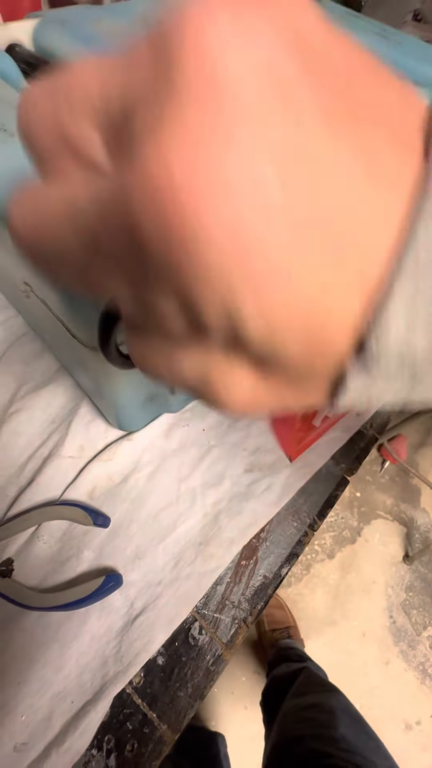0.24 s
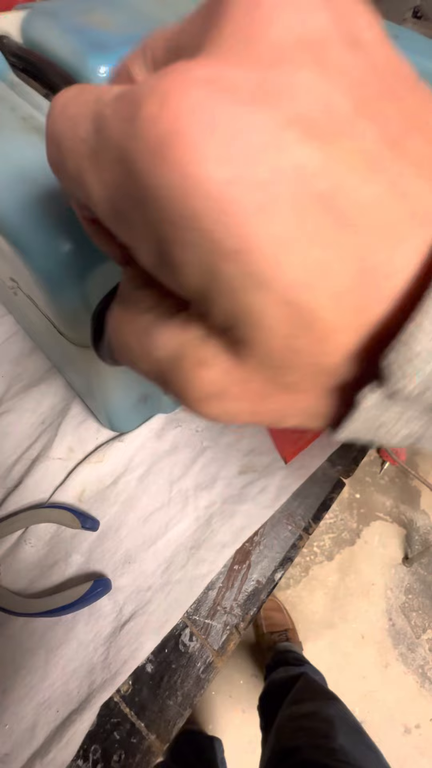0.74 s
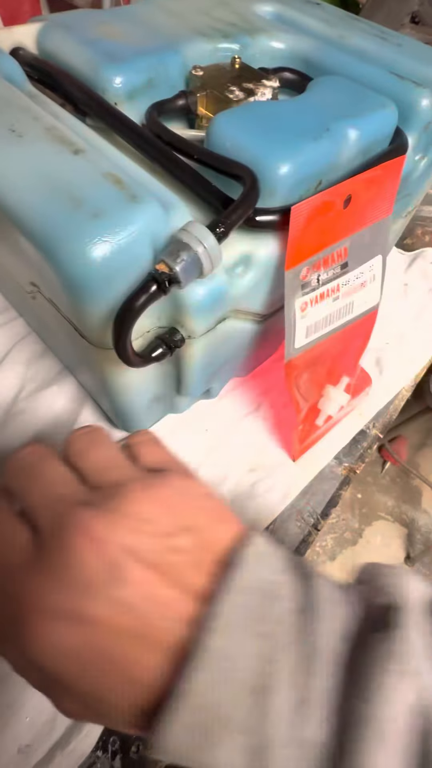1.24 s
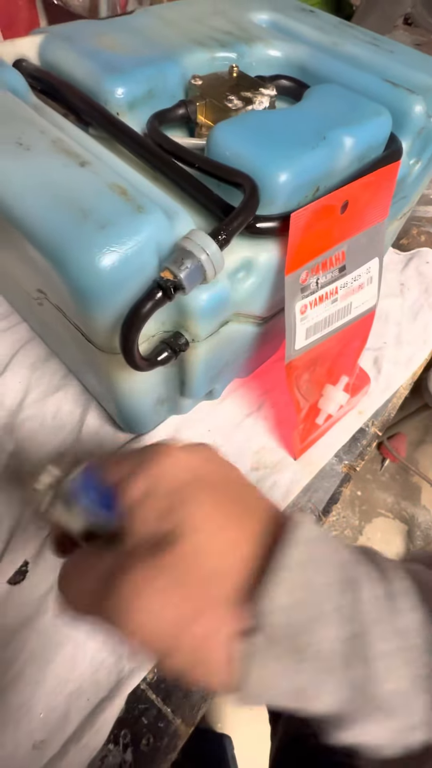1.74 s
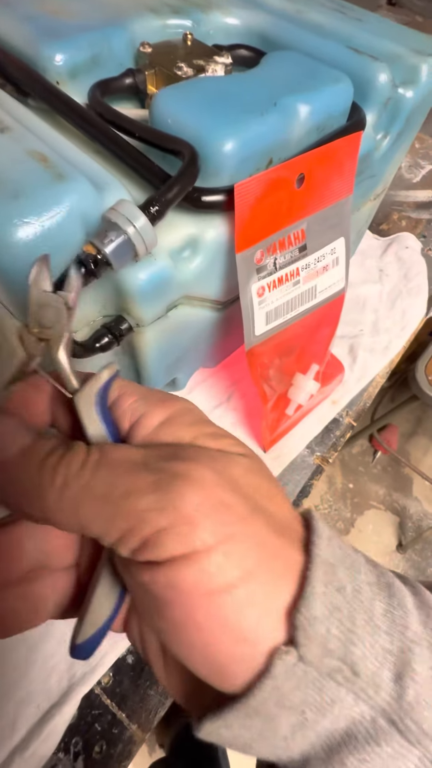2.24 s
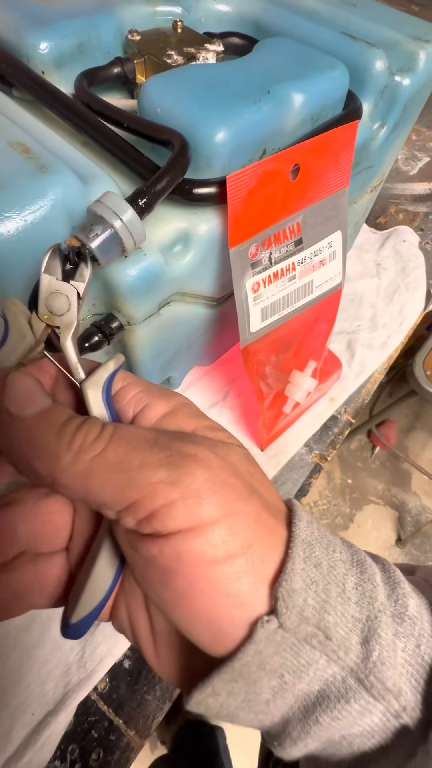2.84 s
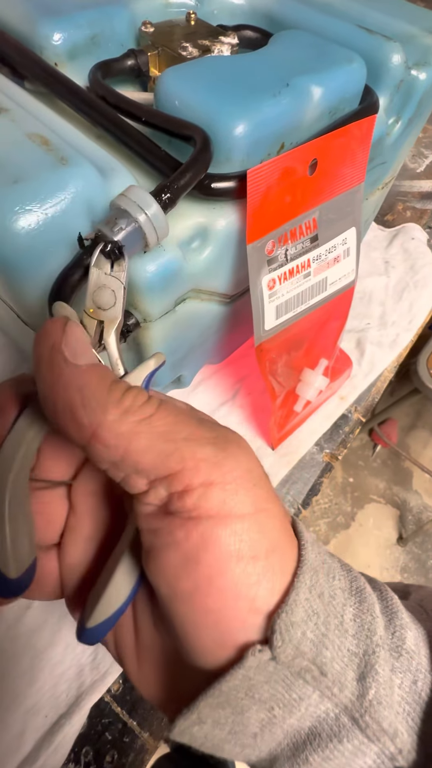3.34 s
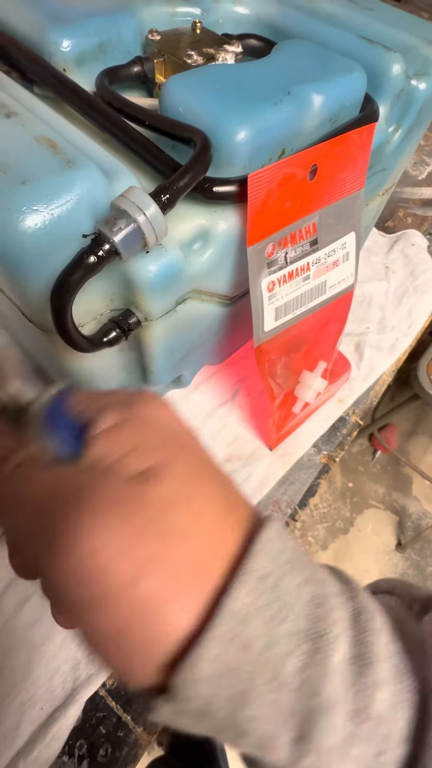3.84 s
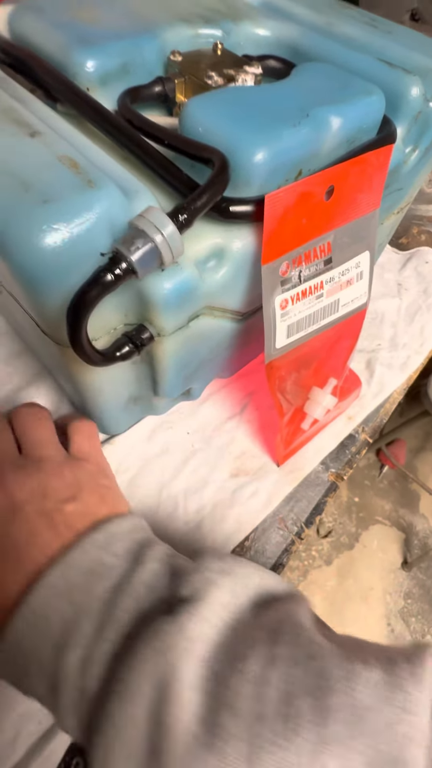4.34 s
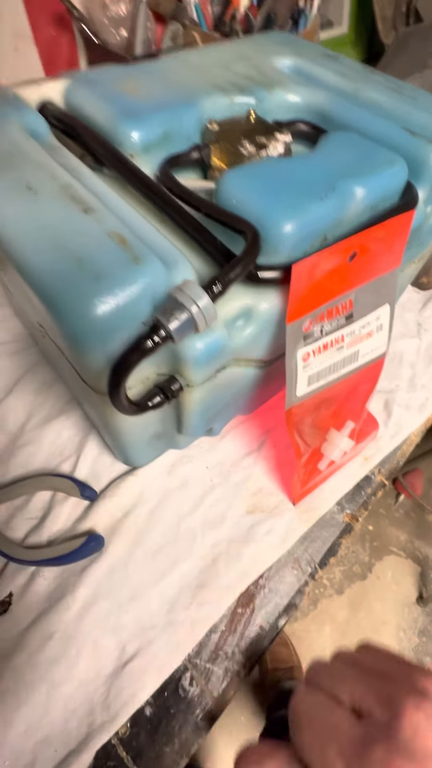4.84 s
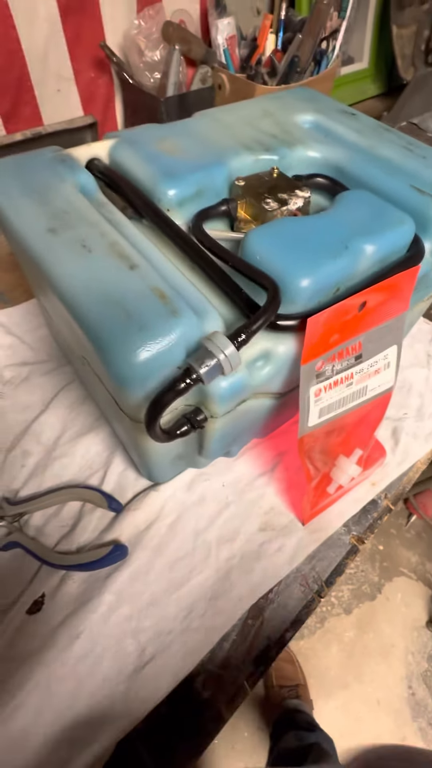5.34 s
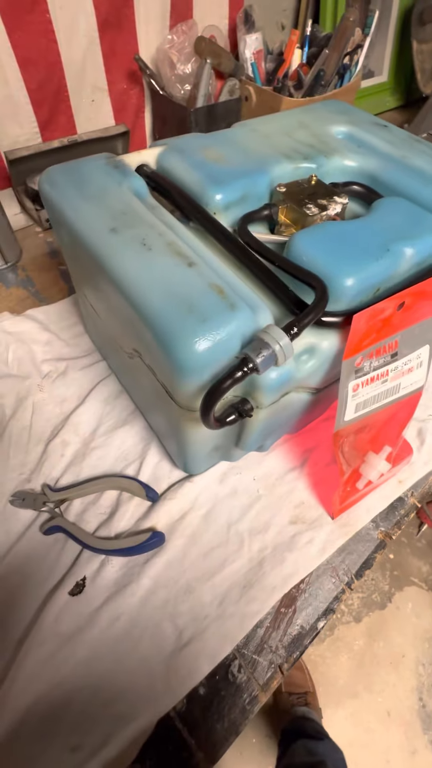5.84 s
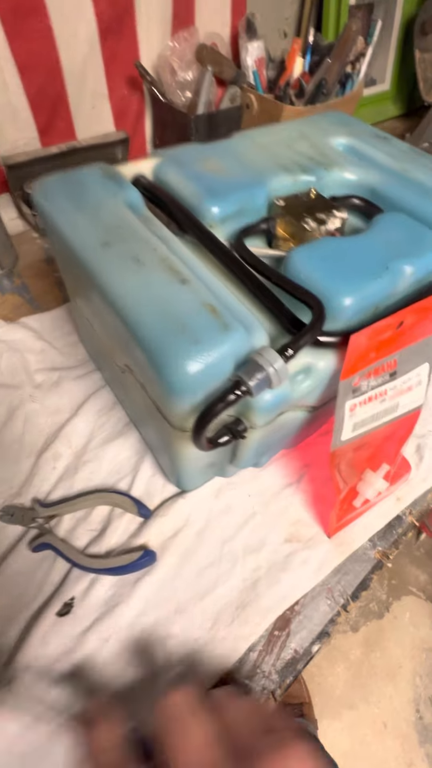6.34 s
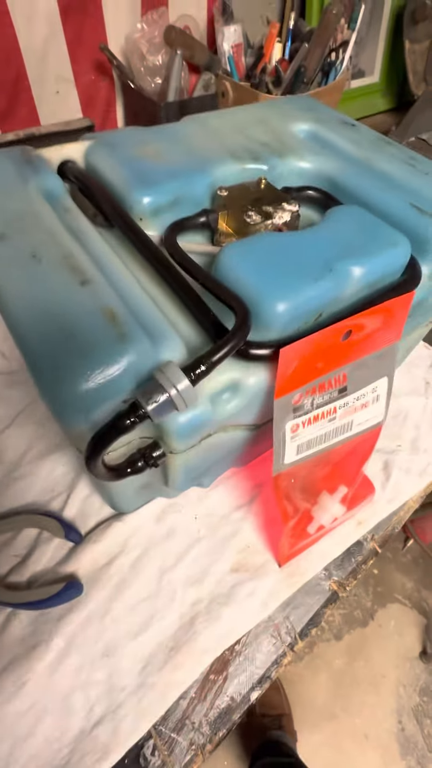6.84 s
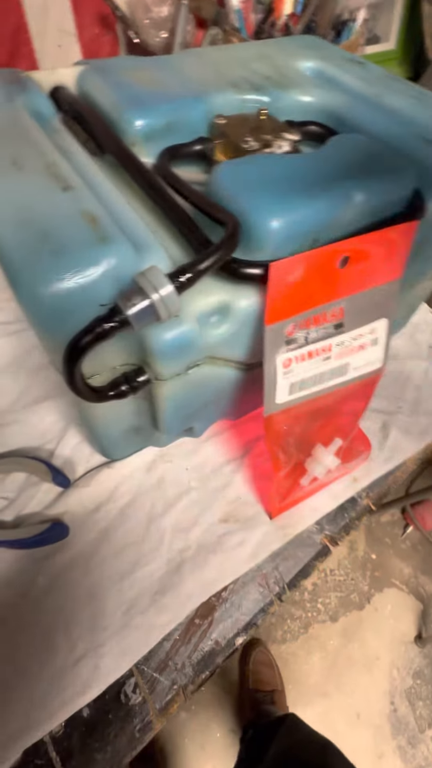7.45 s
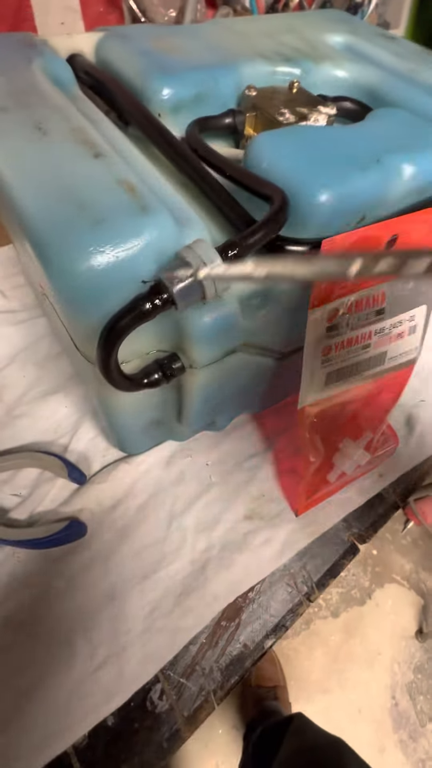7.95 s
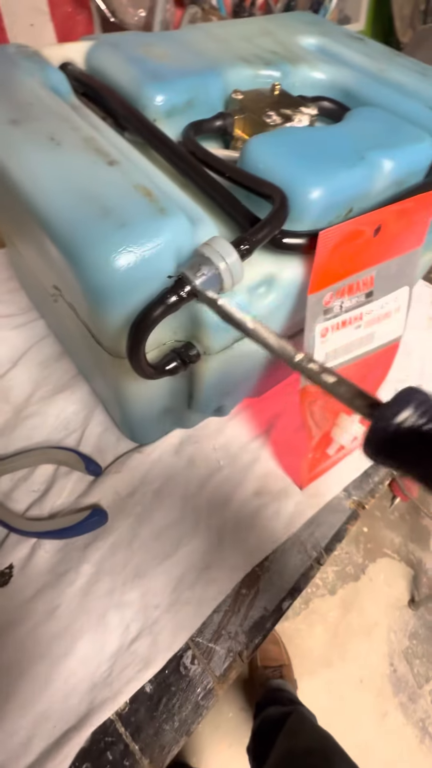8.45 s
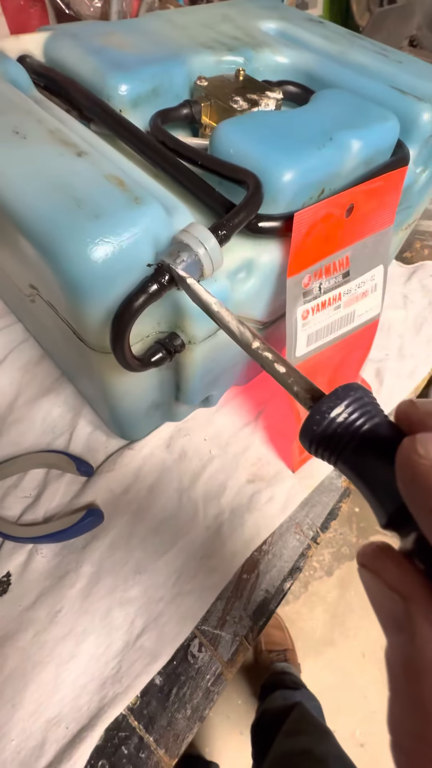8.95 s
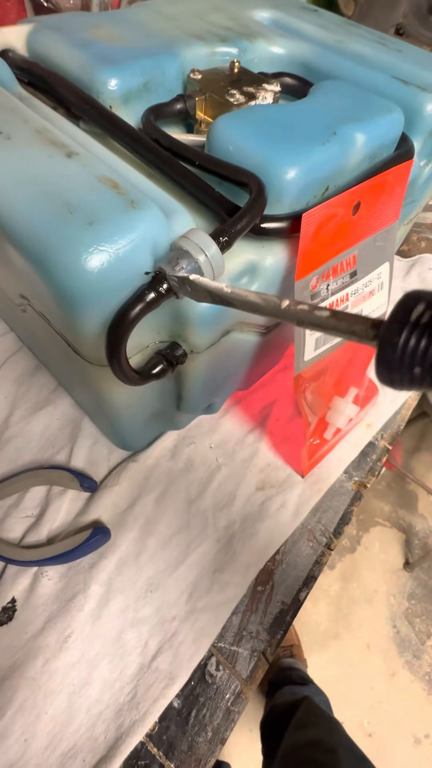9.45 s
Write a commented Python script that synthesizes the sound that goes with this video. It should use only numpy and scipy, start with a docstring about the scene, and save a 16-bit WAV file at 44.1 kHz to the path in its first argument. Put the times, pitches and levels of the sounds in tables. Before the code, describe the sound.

Close hand-held phone in a small workshop. Soft thumps and sleeve rustle on a hollow plastic tank, light ticks as cutters are positioned, then a hard double snap through a plastic tie. The pliers drop with a hollow knock; tools scrape, clink and thud on the bench. Finally a screwdriver tip ticks and scratches faintly at a hose fitting. Low mains hum throughout.

```python
"""In a small workshop, side cutters snip a plastic tie off a hose on a hollow plastic tank. Hands, pliers
and a screwdriver knock, scrape and tick on tank and bench: bursts of noise and rings at the pitches of
bench, steel and hose fitting. Sleeves rustle as flickering hiss, and a mains hum runs underneath.
A hand-held phone with two close ports hears it all; table levels are those before the overall colour."""
import sys
import numpy as np
from scipy import signal
from scipy.fft import rfft, irfft
from scipy.io import wavfile
from scipy.ndimage import uniform_filter1d

SR = 44100
rng = np.random.default_rng(int(sys.argv[2]) if len(sys.argv) > 2 else 0)


def digitize_waveform(pressure):
    """Quantize a signal to 16-bit integers and store it at the path in sys.argv[1].

    Rows of a 2-D input are taken as channels; values are limited to [-1, 1].
    """
    field = np.atleast_2d(pressure).T
    bounded = np.clip(field, -1, 1)
    quanta = np.round(bounded * 32767).astype(np.int16)
    wavfile.write(sys.argv[1], SR, quanta)


N = 427329  # length in samples
T = np.arange(N) / SR  # time in seconds
HZ = np.arange(N // 2 + 1) * SR / N + 1e-3  # pitch of each spectrum bin, kept above zero for the logarithm


def undb(db):
    """Turn decibels into a plain factor."""
    return 10 ** (np.asarray(db) / 20)


def unit(x):
    """Scale to an rms level of 1."""
    return x / np.sqrt(np.mean(x ** 2))


def shape(x, table):
    """Colour a sound by points of pitch and level, joined by straight lines over log pitch."""
    hz, db = np.transpose(table)
    gain_db = np.interp(np.log(HZ), np.log(hz), db)
    return irfft(rfft(x) * undb(gain_db), N)


def bandpass(low_hz, high_hz, order=2):
    """A filter that keeps the sound between two pitches."""
    return signal.butter(order, [low_hz, high_hz], "band", fs=SR, output="sos")


def fade(t, t60):
    """Die away by 60 dB in t60 seconds."""
    return np.exp(-np.log(1000) * t / t60)


def add(out, start, sound):
    """Mix a sound in at its start, in seconds."""
    i = int(start * SR)
    out[..., i:i + sound.shape[-1]] += sound[..., :N - i]


def walk(rate):
    """Random levels, each held 1 / rate seconds, then smoothed twice into a wander."""
    hold = int(SR / rate)
    steps = np.repeat(rng.standard_normal(N // hold + 1), hold)
    return uniform_filter1d(uniform_filter1d(steps, hold), hold)[:N]


def pressure(length):
    """Pressure rises quickly from nothing and eases off again over the length in seconds."""
    return np.sin(np.pi * (T[:int(length * SR)] / length) ** 0.47) ** 2


def press(out, rows):
    """Add a stroke of pressure for each start, length and level."""
    for start, length, db in rows:
        add(out, start, undb(db) * pressure(length))


def ring(modes, t, weights, damping, shift=0.95):
    """Sound all modes at once; each builds over a couple of its cycles, so the lows come late."""
    hz, db, t60 = np.transpose(modes)[:, :, None]
    hz = hz * np.reshape(shift, (-1, 1))  # by default every mode sounds 5 % below its table pitch
    build = 1 - np.exp(-t * hz / 2.0)
    waves = np.sin(2 * np.pi * hz * t) * fade(t, t60 / damping) * build
    return (weights * undb(db[:, 0])) @ waves


def ring_through(push, body):
    """Let a stream of small pushes set off a body's ring, scaled to unit energy."""
    return signal.fftconvolve(push, body)[:N] / np.sqrt(np.sum(body ** 2))


def ports(mid, other, table):
    """The close ports share one sound and differ by another, which is weak in the bass."""
    return mid + shape(other, table) * np.array([[1], [-1]])


# How the ports differ for sound from all round.
# Each row: pitch in Hz, level of the difference against the shared sound in dB.
PORTS_ROUND = [(30, -24.5), (200, -4), (700, 7), (1500, 0), (8000, -1), (16000, 16)]
# Colour of the room's hush. Each row: pitch in Hz, relative level in dB per Hz.
HUSH_COLOUR = [(20, -14), (45, 1), (75, 3.5), (100, -2.5), (160, -7.5), (250, -12.5), (400, -22.5),
               (800, -24), (1200, -36), (1800, -28.5), (4000, -49), (10000, -55.5)]
HUSH_DB = -64.5  # rms, before it wavers
# Tones of the mains hum. Each row: pitch in Hz, rms level in dB before it wavers.
HUM = [(119.6, -62), (239.2, -77)]


def shop():
    """A mains hum that wavers slightly over the hush of the room, whose bass heaves more than the rest."""
    drift = np.cumsum(0.00028 * walk(18)) / SR  # seconds
    hum = 0
    for hz, db in HUM:
        level = undb(db + 3.8 * walk(14.0)) * np.sqrt(2)
        hum = hum + level * np.sin(2 * np.pi * hz * (T + drift))
    mid, other = [shape(noise, HUSH_COLOUR) for noise in rng.standard_normal((2, N))]
    hush = unit(ports(mid, other, PORTS_ROUND))
    bass = signal.sosfiltfilt(signal.butter(2, 110, fs=SR, output="sos"), hush)
    wavering = bass * undb(3.6 * walk(5.8)) + (hush - bass) * undb(1.3 * walk(5.0))
    return hum + undb(HUSH_DB) * wavering


# Loudness of sleeves and cloth, gliding from row to row. Each row: time in seconds, level in dB.
RUSTLE = [(0.0, -77), (0.75, -80), (0.89, -71), (1.32, -82.5), (1.91, -76), (2.16, -83), (3.02, -81.5),
          (3.24, -64.5), (3.43, -82.5), (3.8, -73.5), (5.26, -74), (5.86, -67), (7.02, -79), (7.29, -73.5),
          (9.26, -84.5), (9.69, -76.5)]
# Colour of the cloth. Each row: pitch in Hz, relative level in dB.
CLOTH = [(500, -8), (1500, 2), (2500, 3.5), (4000, -1.5), (6000, -5.5), (9000, -3.5), (16000, -6.5)]


def rustle():
    """Fibres brush past each other: a hiss that flickers, with tiny crackles."""
    flicker_db = 0.65 * walk(27) + 2.1 * rng.exponential(size=N)
    fibres = rng.standard_normal((2, N)) * undb(flicker_db)
    mid, other = [unit(shape(f, CLOTH)) for f in fibres]
    level_db = np.interp(T, *np.transpose(RUSTLE))
    return ports(mid, other, PORTS_ROUND) * undb(level_db)


# Pitches at which tank and bench ring; the ring lowers them by 5 % and a damping shortens them.
# Each row: pitch in Hz, relative level in dB, undamped time to fade by 60 dB in seconds.
BENCH = [(128.74, 6, 0.22), (174, 6, 0.18), (200, -7.5, 0.34), (250, -16.5, 0.58), (280, -7, 0.33),
         (300.3, 6, 0.1), (339, 2.5, 0.14), (397, -11, 0.29), (506, -2.5, 0.15), (536.8, -10, 0.22),
         (536, -2.5, 0.084), (626, 2, 0.12), (700, -1.5, 0.064), (699, -5.5, 0.086), (883.5, -7, 0.23),
         (903, -10.5, 0.26), (1005, -2, 0.088), (1145, -3, 0.039), (1190, -0.5, 0.044), (1297, -5, 0.091),
         (1450, -2, 0.073), (1520, -8, 0.11), (1736, -5.5, 0.07), (2060, -4, 0.024), (2300, -12.5, 0.051)]
# Pitches at which the tools' steel rings, before any shift or damping.
# Each row: pitch in Hz, relative level in dB, undamped time to fade by 60 dB in seconds.
STEEL = [(1766, -8.5, 0.31), (2065, -5.5, 0.25), (2696, -4.5, 0.093), (3160, -6.5, 0.1),
         (3430, -14.5, 0.07), (3850, -5, 0.044), (4450, -9.5, 0.059), (5090, -13, 0.062),
         (5800, -11, 0.024), (6100, -12, 0.075)]
# Things dragged over tank and bench; levels are at full pressure, before they cluster.
# Each row: start in seconds, length in seconds, body level in dB, hardness as grit against body in dB.
DRAGS = [(0.083, 0.39, -65, -4), (0.652, 0.665, -65.5, -7), (0.966, 0.06, -47.5, -3),
         (1.417, 0.14, -57.5, -10), (2.339, 0.08, -57, -2), (2.57, 0.049, -73, 5.5),
         (2.737, 0.104, -58.5, -13), (2.886, 0.04, -62.5, -5.5), (3.075, .124, -59.5, -19),
         (3.2, .123, -59, -21), (3.605, 0.18, -52.5, -19.5), (3.616, 0.025, -46.5, 8),
         (3.846, 0.029, -58.5, -7), (4.277, 0.09, -40.5, -8), (5.57, 0.068, -62.5, -41),
         (5.612, 0.11, -48.5, -5.5), (5.641, 0.078, -34.5, -3.5), (5.724, 0.067, -38.5, -4.5),
         (5.765, 0.077, -51, -6), (5.827, 0.32, -51.5, -18.5), (6.415, 0.035, -44, -1),
         (6.467, 0.2, -54.5, -3), (6.589, 0.06, -42, 4.5), (6.653, 0.15, -57.5, -15),
         (6.803, 0.18, -55.5, -12), (6.928, 0.089, -54, -0.5), (8.149, 0.064, -60.5, -1.5),
         (8.357, 0.185, -59.5, -3.5), (8.743, 0.11, -63.5, -4), (9.002, 0.026, -54, -6),
         (9.402, 0.46, -65.5, -5.5)]
# Steel grinds hard on steel or on the tie, with the same clustering.
# Each row: start in seconds, length in seconds, level at full pressure in dB.
GRINDS = [(1.639, 0.026, -71), (3.03, 0.21, -76), (3.629, 0.025, -35.5), (3.66, 0.07, -50.5),
          (6.83, 0.24, -67), (6.94, 0.11, -86), (8.458, 0.046, -71)]
RASP_DB = -10  # the steel's share of a drag, against the grit
BODY_DAMPING, GRIT_DAMPING, STEEL_DAMPING = 3.8, 1.7, 1.7  # 1 = rings freely


def drags_and_grinds():
    """Uneven slips ring the bench's low modes, grate through its upper ones and rasp on the steel."""
    low, t = np.array(BENCH)[:, 0] < 700, T[:SR // 4]
    slip_now = rng.random((3, N)) < 1000 / SR  # about 1000 slips a second
    slips = slip_now * undb(10 * rng.random((3, N))) * rng.standard_normal((3, N))
    click = 1. * (t == 0)
    scratch = signal.sosfilt(bandpass(1800, 7500), click)
    steel = unit(ring(STEEL, t, 1., STEEL_DAMPING)) + undb(-3) * unit(scratch)
    body = ring(BENCH, t, 1. * low, BODY_DAMPING)
    grit = ring(BENCH, t, 1. * ~low, GRIT_DAMPING)
    push = np.zeros((3, N))  # on body, grit and steel
    for start, length, db, hardness in DRAGS:
        levels_db = [db, db + hardness, db + hardness + RASP_DB]
        add(push, start, undb(levels_db)[:, None] * pressure(length))
    press(push[2], GRINDS)
    push *= undb(5.0 * walk(120))  # it sticks and lets go in clusters
    return sum(ring_through(p * unit(s), b) for p, s, b in zip(push, slips, (body, grit, steel)))


# How the ports differ for work on the bench.
# Each row: pitch in Hz, level of the difference against the shared sound in dB.
PORTS_BENCH = [(30, -32.5), (200, -22.5), (400, -10.5), (700, -1), (2400, -6), (4400, 1), (8000, -2.5),
               (16000, 11.5)]
# The room's answer, band by band.
# Each row: middle pitch in Hz, relative level in dB, time to fade by 60 dB in seconds.
ROOM = [(139, -19, 0.55), (460, -18, 0.48), (760, -20, 0.55), (1500, -19.5, 0.077), (4040, -25, 0.12),
        (9000, -14.5, 0.17)]


def echo(x):
    """The walls answer with noise tails, band by band."""
    t = T[:SR // 2]
    rise = np.minimum(t / 0.0038, 1)
    tails = 0
    for hz, db, t60 in ROOM:
        band = bandpass(0.54 * hz, 1.26 * hz, order=1)
        noise = signal.sosfilt(band, rng.standard_normal((2, len(t))))
        # the square root evens out long tails and wide bands
        tails = tails + undb(db) * fade(t, t60) / np.sqrt(t60 * hz) * rise * noise
    mid, other = signal.fftconvolve(x[None], tails, axes=1)[:, :N]
    return ports(mid, other, PORTS_BENCH)


# Deep tones that swell and die after shoves or handling of the phone.
# Each row: start in seconds, peak level in dB, pitch in Hz, time scale of the swell in seconds.
BOOMS = [(0.123, -41.5, 64, 0.012), (0.377, -31, 61.5, 0.003), (0.79, -42.5, 61.8, 0.0036),
         (0.989, -37, 62.9, 0.0064), (1.4, -44.5, 60, 0.023), (3.211, -42.5, 66.6, 0.0035),
         (3.665, -38.5, 46.5, 0.048), (4.345, -34, 62.3, 0.067), (5.622, -44.5, 67.2, 0.12),
         (5.921, -40, 65.4, 0.086), (6.439, -42.5, 63.5, 0.027), (6.62, -45.5, 65, 0.024)]
# Dead, deep bumps. Each row: start in seconds, peak level in dB, pitch in Hz.
BUMPS = [(0.3642, -23, 101), (3.623, -20, 51.95)]
BOOM_T60_S = 0.52
BUMP_SWELL_S, BUMP_CYCLES = 0.0033, 1.8  # a bump's fade by 60 dB is counted in cycles


def booms():
    """A deep tone swells after a shove or handling of the phone, then dies; a bump lasts a few cycles."""
    out, t = np.zeros(N), T[:SR]
    rows = [(*row, BOOM_T60_S) for row in BOOMS]
    rows += [(start, db, hz, BUMP_SWELL_S, BUMP_CYCLES / hz) for start, db, hz in BUMPS]
    for start, db, hz, swell, t60 in rows:
        envelope = (1 - np.exp(-t / swell)) ** 2 * fade(t, t60)
        add(out, start, undb(db) * np.sin(2 * np.pi * hz * t) * envelope / envelope.max())
    return out


# Knocks through tank and bench. Each row: start in seconds, peak level of the ring in dB,
# favoured pitch in Hz among the bench's table pitches, damping (1 = rings freely),
# strength of the slap noise against the ring in dB.
KNOCKS = [(.124, -39.5, 174, 2.6, 4), (.3665, -28, 125, 3.1, -33), (.805, -44, 1000, 2.5, 2),
          (.807, -38, 397, 3.5, -15), (.904, -49, 298, 2.6, -21), (0.995, -33.5, 198, 2.6, -30),
          (2.347, -45, 183, 2.3, -20), (2.583, -50, 250, 1.4, -26), (2.757, -43, 200, 3, -35),
          (2.899, -49.5, 173, 1.8, -25), (3.203, -26.5, 880, 2.8, -18.5), (3.213, -27, 183, 4.9, -27),
          (4.2938, -28.5, 1350, 4.4, -10.5), (4.2947, -7, 361, 3.67, -26), (4.2955, -11, 637.4, 2.1, -33.5),
          (4.306, -18, 148.9, 0.74, -41.5), (4.331, -30, 1015, 2.5, -3.5), (5.689, -23, 356, 2.4, -33),
          (5.879, -43, 1330, 1.1, 0), (5.886, -31, 194, 1.4, -40), (6.414, -40.5, 448, 1.3, -37),
          (6.4234, -23, 1570, 2.8, 5), (6.4233, -10.5, 357, 1.9, -12.5), (6.525, -23.5, 314, 1.3, -38),
          (6.527, -37, 1300, 1.7, -25), (6.5939, -11.5, 347.4, 1.9, -20), (6.5925, -25, 1317, 3, 3.5),
          (6.604, -14, 333, 2.5, -20.5), (6.624, -25, 331, 1.9, -2.5), (6.826, -40.5, 200, 3.9, 9),
          (8.066, -45, 280, 1.5, -32.5), (8.164, -45, 280, 2.2, -14), (9.256, -46, 282.7, 1.7, -32)]
SOFT_SPREAD_OCT, HARD_SPREAD_OCT = 1.1, 0.68  # harder blows pick a narrower group of modes


def knocks():
    """Each blow lands elsewhere and wakes the modes near its own pitch; loose parts slap and rattle."""
    out, t = np.zeros(N), T[:SR // 2]
    modes_hz = np.array(BENCH)[:, 0]
    places = rng.standard_normal((len(KNOCKS), len(BENCH)))
    noises = signal.sosfilt(bandpass(900, 2600), rng.standard_normal((len(KNOCKS), len(t))))
    # a quick slap with a weak, longer rattle behind it
    slap_envelope = np.minimum(t / 0.0018, 1) * (fade(t, 0.007) + 0.1 * fade(t, 0.26))
    for (start, db, hz, damping, slap_db), place, noise in zip(KNOCKS, places, noises):
        spread = np.interp(db, [-50, 0], [SOFT_SPREAD_OCT, HARD_SPREAD_OCT])
        near = 1 / (1 + (np.log2(modes_hz / hz) / spread) ** 2) ** 2
        blow = ring(BENCH, t, near * undb(2 * place), damping)
        slap = undb(slap_db) * noise * slap_envelope
        add(out, start, undb(db) * (blow / np.abs(blow).max() + slap))
    return out


# Ticks of steel and hard plastic. Each row: start in seconds, peak level in dB, ring pitch in Hz,
# edge setting in dB (before a fixed boost), time for the ring to fade by 60 dB in milliseconds.
TICKS = [(0.1247, -44, 1520, -4, 14), (0.8041, -39.5, 1500, -37, 5.7), (0.981, -40.5, 1660, -11, 16),
         (0.9967, -35, 1360, -31, 8.3), (1.4125, -51.5, 1360, 9, 30), (1.6467, -48, 1740, -6, 14),
         (2.329, -50.5, 1500, -6, 25), (2.7558, -46.5, 1370, -49, 31), (3.0923, -40.5, 1470, -2, 13),
         (3.142, -43.5, 1810, -3.5, 36), (3.1913, -39, 1880, -13, 20), (3.1994, -19, 1803, -8.5, 20),
         (3.2017, -14.5, 1520, -5, 17), (3.222, -31, 1280, -15, 18), (3.418, -49.5, 1500, 8, 13),
         (3.559, -49, 1640, -6, 21), (3.606, -15, 2430, -4.5, 3.9), (3.6142, -7.5, 2310, -7.5, 7),
         (3.636, -23, 5060, -10, 7.9), (3.644, -9, 4240, -2, 2.3), (3.6647, -27.5, 1450, -39, 22),
         (3.671, -29, 2450, -3, 4.7), (3.6786, -0.5, 2120, -3.5, 6), (3.722, -37.5, 1362, -18, 25),
         (3.8568, -47, 1550, -24, 6.5), (4.1066, -38.5, 880, -7, 27), (5.7409, -35, 1410, -16, 14),
         (5.879, -26.5, 2290, -12.5, 25), (6.8237, -44.5, 1708, -7, 23), (6.9497, -39, 1056, -35, 44.6),
         (8.0621, -36.5, 1440, -37, 23), (8.159, -34, 1783, -19, 4.3), (8.195, -51.5, 1433, -34, 24),
         (8.3816, -50, 1420, -22, 22), (8.4719, -40, 1620, -11, 41), (8.7253, -46, 2820, -0.5, 16),
         (8.777, -53, 1500, -29, 20), (9.0094, -49, 1430, -15, 22.3), (9.1124, -51, 1810, 8, 23)]
TICK_RISE_S, EDGE_BOOST_DB = 0.00087, 13


def ticks():
    """A snap: a damped ring pair, a crack of noise around it and a bright edge."""
    out, t = np.zeros(N), T[:3000]
    edge_filter = signal.butter(2, 4500, "high", fs=SR, output="sos")
    noises = rng.standard_normal((len(TICKS), 2, len(t)))
    for (start, db, hz, edge_db, t60_ms), noise in zip(TICKS, noises):
        t60 = t60_ms * 1e-3
        tones = np.sin(2 * np.pi * hz * t) + .5 * np.sin(2 * np.pi * 1.1 * hz * t)
        pair = tones * fade(t, t60)
        around = bandpass(0.33 * hz, 1.8 * hz)
        crack = 0.49 * signal.sosfilt(around, noise[0]) * fade(t, 1.9 * t60)
        bright = signal.sosfilt(edge_filter, noise[1]) * fade(t, 0.71 * t60)
        edge = undb(edge_db + EDGE_BOOST_DB) * bright
        snap = (pair + crack + edge) * np.minimum(t / TICK_RISE_S, 1) ** 2
        add(out, start, undb(db) * snap / np.abs(snap).max())
    return out


# A sleeve or hand brushes by in one quick swish.
# Each row: start in seconds, length in seconds, level at full pressure in dB.
SWISHES = [(0.322, 0.082, -64.5), (0.746, 0.1, -62), (0.97, 0.055, -58), (1.638, 0.071, -61.5),
           (1.692, 0.33, -68), (1.9, 0.28, -65.5), (3.016, 0.29, -64), (3.252, 0.14, -63),
           (3.404, 0.11, -70.5), (4.009, 0.18, -64.5), (4.188, 0.11, -67), (4.929, 0.11, -63),
           (6.417, 0.35, -59), (7.163, 0.15, -68), (8.374, 0.2, -69)]
# Colour of a swish. Each row: pitch in Hz, relative level in dB.
SWISH_COLOUR = [(2000, -18.5), (5000, -9), (8000, 0.5), (16000, -1)]


def swishes():
    """Short, thin hisses of cloth close to the phone: noise that swells and eases with pressure."""
    push = np.zeros(N)
    press(push, SWISHES)
    mid, other = [unit(shape(noise, SWISH_COLOUR)) for noise in rng.standard_normal((2, N))]
    return push * ports(mid, other, PORTS_ROUND)


# Steel clinks on steel and rings on.
# Each row: start in seconds, peak level in dB, favoured pitch in Hz.
CLINKS = [(3.6362, -36, 5000), (5.649, -44, 2100), (5.667, -38, 5800), (5.674, -40, 3070),
          (5.742, -40.5, 5600), (5.744, -56, 2120), (5.882, -35, 4150), (5.896, -40.5, 3160),
          (6.827, -62, 1790), (8.0635, -64, 2670), (8.156, -60, 2689)]
CLINK_SPREAD_OCT, CLINK_DAMPING = .35, 1.1
DETUNE = .0125  # typical shift of a mode, as a fraction of its pitch


def clinks():
    """Each clink wakes the steel's modes near its own pitch, shifted a little by grip and load."""
    out, t = np.zeros(N), T[:SR // 4]
    modes_hz = np.array(STEEL)[:, 0]
    draws = rng.standard_normal((len(CLINKS), 2, len(STEEL)))
    for (start, db, hz), (place, grip) in zip(CLINKS, draws):
        near = 1 / (1 + (np.log2(modes_hz / hz) / CLINK_SPREAD_OCT) ** 2)
        clink = ring(STEEL, t, near * undb(2 * place), CLINK_DAMPING, 1 + DETUNE * grip)
        add(out, start, undb(db) * clink / np.abs(clink).max())
    return out


# The screwdriver's tip stutters over the hose fitting.
# Each row: start in seconds, length in seconds, level at full pressure in dB.
POKES = [(8.331, 0.099, -63.5), (8.377, 0.095, -60), (8.526, 0.052, -63.5), (8.61, 0.077, -66.5),
         (8.699, 0.1, -69)]
# Pitches at which the fitting rings.
# Each row: pitch in Hz, relative level in dB, time to fade by 60 dB in seconds.
FITTING = [(830, 0.5, 0.021), (1460, 5.5, 0.016), (1730, 4, 0.013), (2840, -3, 0.0094), (4600, -8, .003)]


def pokes():
    """Separate gritty catches of the tip, each a short ring of the fitting."""
    push = np.zeros(N)
    press(push, POKES)
    body = ring(FITTING, T[:SR // 10], 1., damping=1, shift=1)
    catches = (rng.random(N) < 900 / SR) * rng.standard_normal(N)  # about 900 a second
    return ring_through(push * unit(catches), body)


def scene():
    """Put the work on the bench, its echo, the cloth and the room together."""
    near = ticks() + clinks() + knocks() + drags_and_grinds() + pokes()
    # work on the bench reaches the right port first: the ports differ in phase, not in level
    quarter_turn = irfft(-1j * rfft(near), N)
    bench = ports(near + booms(), quarter_turn, PORTS_BENCH)
    return bench + echo(near) + rustle() + swishes() + shop()


# Overall treble colour, with little sound around 12.6 kHz; pitches below the first row get its level too.
# Each row: pitch in Hz, level in dB.
TREBLE_COLOUR = [(9500, 2.5), (10800, -3.5), (11500, -21.5), (12600, -40.5), (14000, -16.5), (15500, -8.5)]
TOP_HZ = 16300  # next to nothing is heard above


def record(dry):
    """Colour the treble, leaving little around 12.6 kHz, round the loudest snaps and cut the top."""
    heard = np.tanh(shape(dry, TREBLE_COLOUR))
    top_cut = signal.ellip(10, .2, 80, TOP_HZ, fs=SR, output="sos")
    return signal.sosfilt(top_cut, heard)


dry = scene()
out = record(dry)
digitize_waveform(out)
```